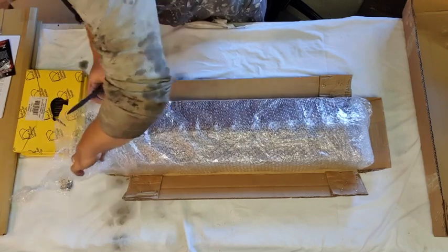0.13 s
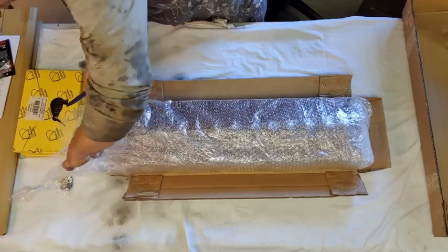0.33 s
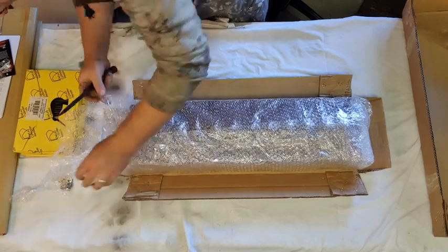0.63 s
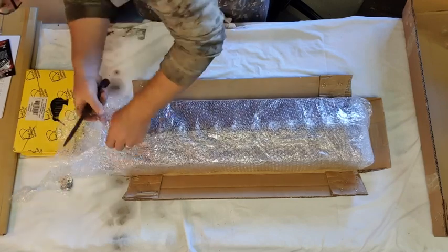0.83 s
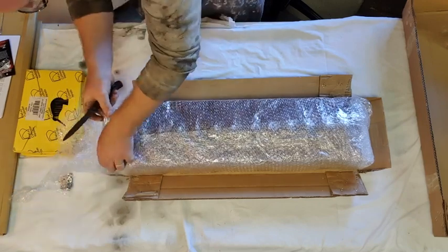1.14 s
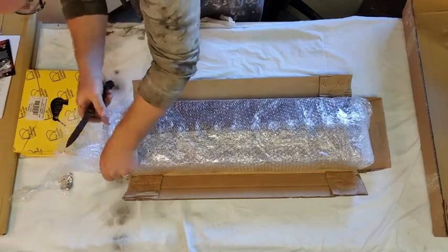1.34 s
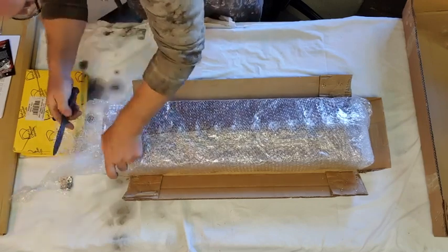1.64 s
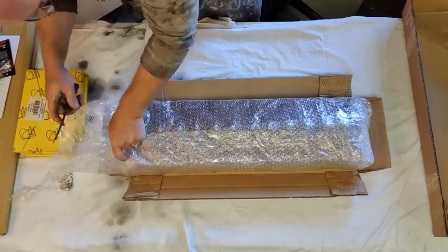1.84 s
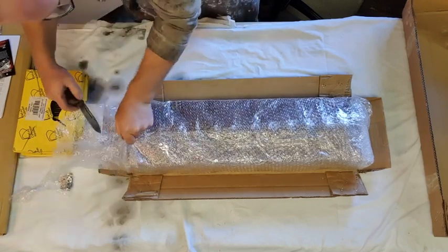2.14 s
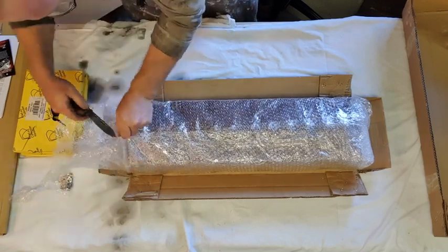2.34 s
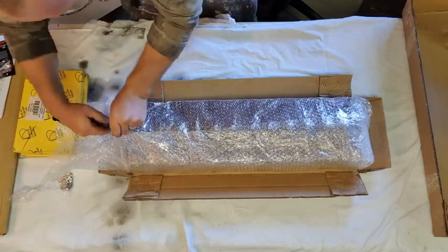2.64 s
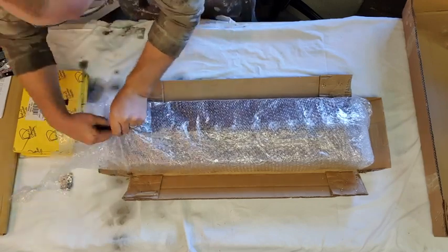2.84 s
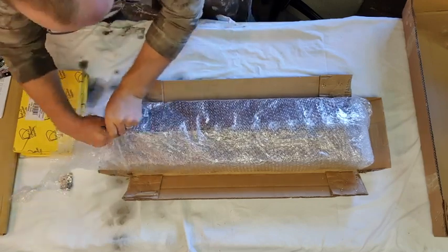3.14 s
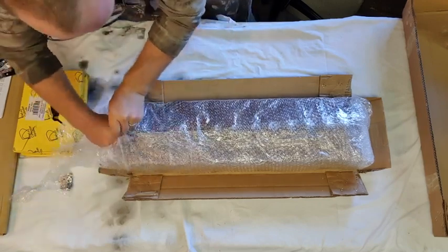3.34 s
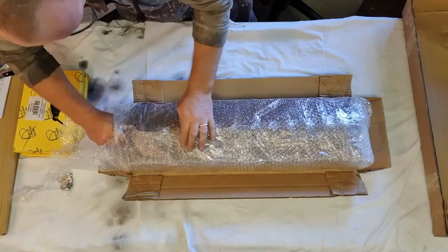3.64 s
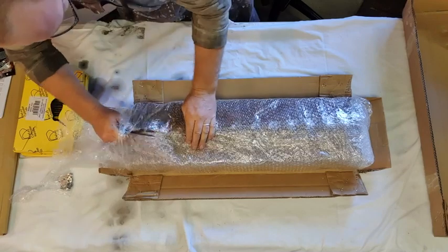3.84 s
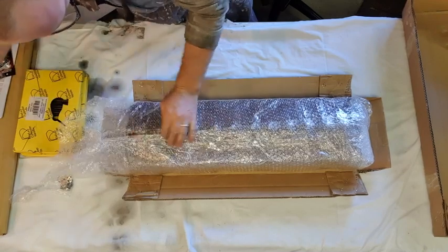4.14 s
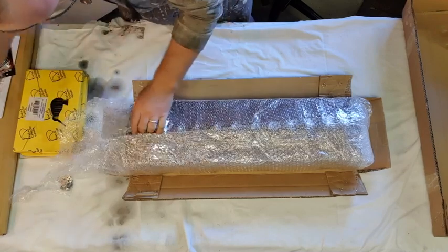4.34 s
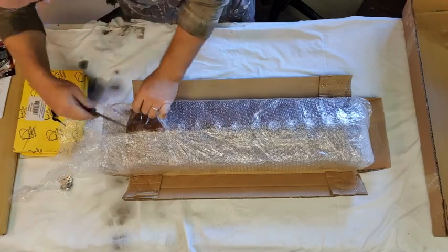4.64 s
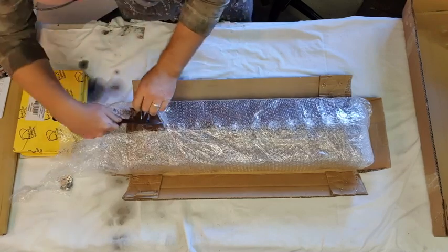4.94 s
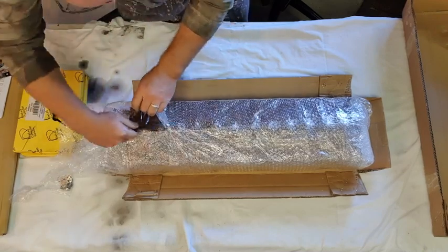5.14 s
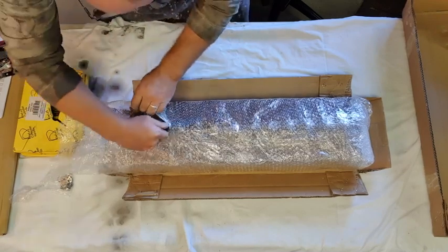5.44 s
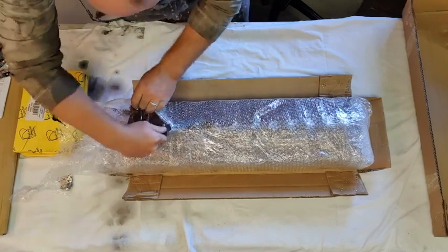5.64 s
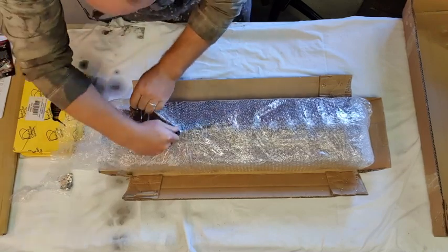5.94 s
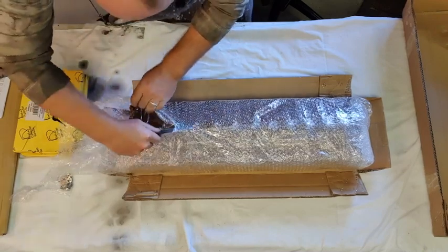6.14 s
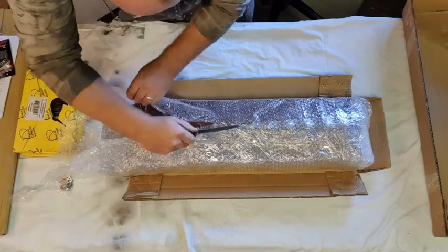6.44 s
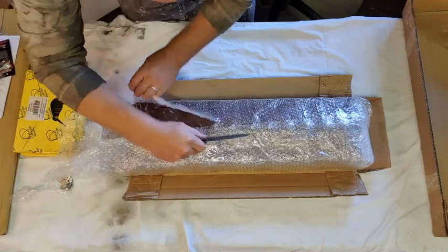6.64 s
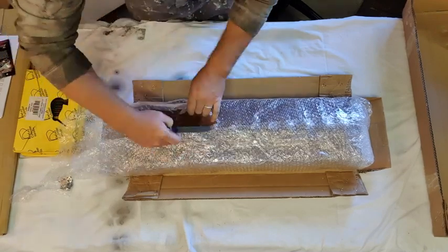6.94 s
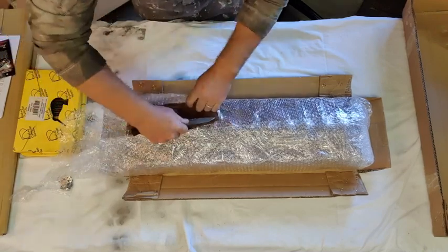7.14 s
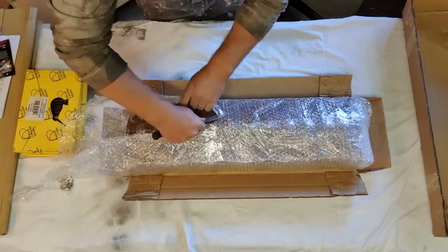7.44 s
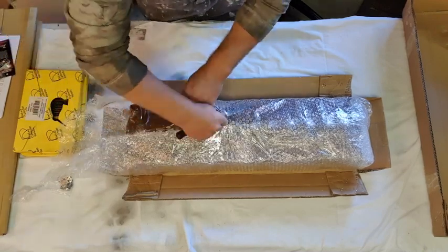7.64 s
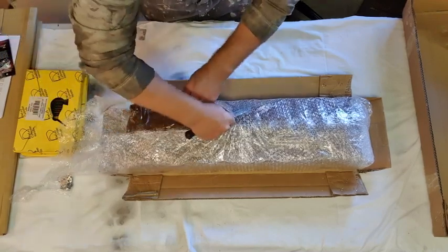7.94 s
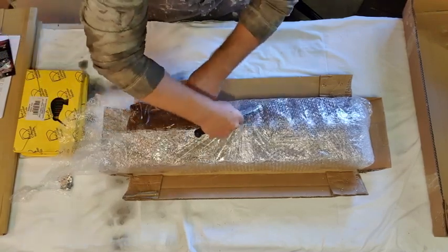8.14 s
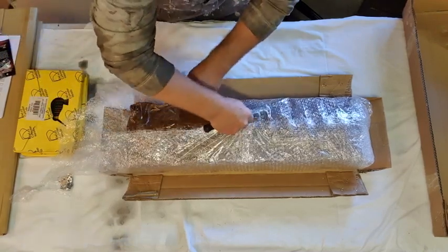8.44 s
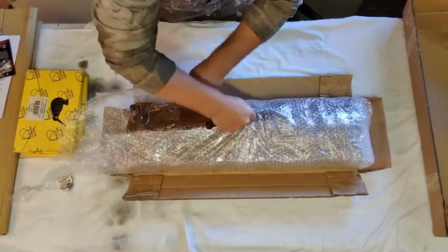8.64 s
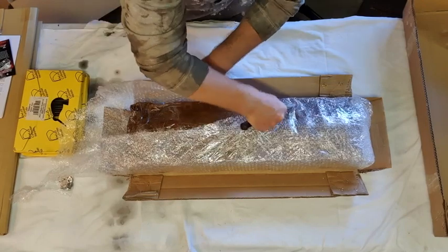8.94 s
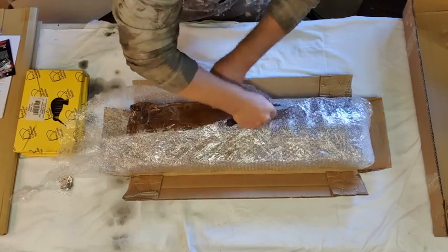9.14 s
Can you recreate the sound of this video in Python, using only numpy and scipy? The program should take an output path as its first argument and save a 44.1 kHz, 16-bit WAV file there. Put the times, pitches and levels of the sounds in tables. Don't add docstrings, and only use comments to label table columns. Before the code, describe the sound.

Hands grip and rustle bubble wrap quietly for about three seconds, with small crease ticks and soft bench bumps. Two very loud clusters of ripping cracks follow, with a hollow parcel boom. Then quieter handling, faint slipping squeaks, and a knife popping rows of bubbles in short bursts. Close stereo microphones in a bare, live workshop where each snap rings briefly over low rumble.

```python
import sys
import numpy as np
from scipy import signal
from scipy.fft import rfft, irfft, next_fast_len
from scipy.io import wavfile
from scipy.ndimage import uniform_filter1d, map_coordinates

SR = 44100
rng = np.random.default_rng(int(sys.argv[2]) if len(sys.argv) > 2 else 0)


def wav_record(signal):
    frames = np.transpose(np.atleast_2d(signal))
    bounded = np.clip(frames, -1, 1)
    quanta = np.round(bounded * 32767).astype(np.int16)
    wavfile.write(sys.argv[1], SR, quanta)


def makeup_ratio(level_db):
    decades = np.asarray(level_db, float) / 20
    return 10 ** decades


N = 410130


def releases():
    # t/s, peak level/dB, crack f/Hz, low push/dB, bright edge/dB
    tears = [(3.3636, -21.5, 2360, -22, -2), (3.3991, -19.5, 1400, -3.5, -7),
             (3.6141, -5.5, 1220, -8.5, -3.5), (3.6165, -26, 1140, -12, -18), (3.6219, -8, 4700, -3, -15),
             (3.626, 1.5, 1910, -17, -14), (3.6361, -25, 1740, -20, -7.5), (3.6745, -1.5, 2640, -9, -16.5),
             (3.8545, -26.5, 1770, -3, -28), (3.8584, -5, 2600, -16.5, -8), (3.8672, -5.5, 2320, -4, -15),
             (3.9072, -2.5, 1960, -13, -6.5), (3.9152, -2, 3050, -14.5, -11)]
    # t/s, peak level/dB, crack f/Hz, low push/dB, bright edge/dB
    cuts = [(5.4504, -20.5, 2360, -25, 1.5), (6.2518, -23, 1100, -3, -22),
            (6.2562, -12.5, 1940, -3.5, -10.5), (6.2637, -14, 1050, -6, -15),
            (6.2722, -12.5, 2270, -4.5, -17), (6.2878, -6, 2440, -9, -8), (6.2925, -19.5, 2200, 3.5, -16),
            (6.2985, -23, 910, -9, -13), (6.3257, -1.5, 2760, -15.5, -22), (6.3258, -2.5, 4000, -23, -30),
            (6.3403, -7.5, 2170, -17.5, -18), (6.3458, -12, 2360, -11, -14),
            (6.3472, -7.5, 2450, -10.5, -9.5), (7.452, -34, 690, -1, -24), (7.572, -6, 2330, -10, -14.5),
            (8.1045, -42, 3300, -12, -12), (8.109, -13, 2450, -4, -18), (8.1273, -21, 2620, -9, -11),
            (8.1315, -26, 2200, 0.5, -16), (8.1385, -31, 2500, -12, -14), (8.1628, -28, 2480, -22, -16),
            (8.1708, -12.5, 2730, -8.5, -23), (8.7563, -19, 2400, -6, -6.5),
            (8.7742, -25.5, 2600, -2, -2.5), (8.7891, -10, 1440, -1, -10), (8.7977, -9, 2330, 0, -8),
            (8.8024, -1, 2920, -14.5, -10), (8.8116, -11.5, 2300, -0.5, -4), (8.8142, -22.5, 3200, -6, -14),
            (8.8246, -12.5, 1880, -15, -9), (8.8285, -21, 2400, -20, -5), (8.8579, -14.5, 1700, -2, -13.5),
            (8.8601, -17.5, 1410, -5, -14)]
    # t/s, peak level/dB, crack f/Hz, bright edge/dB
    ticks = [(0.963, -49, 1800, -16), (1.2437, -31, 2920, -4), (4.566, -34.5, 1980, -11),
             (2.8426, -34.5, 2340, -14), (2.8474, -42, 4350, -8), (2.8661, -31.5, 1040, -46),
             (2.869, -26.5, 1210, -29), (2.9734, -42, 3380, -5), (2.9979, -30, 1320, -18),
             (3.0453, -44, 1020, 8), (3.58, -33, 1760, -19), (5.265, -48, 4200, 7), (5.4573, -40, 2260, 16),
             (5.592, -26, 2320, -11), (5.6328, -37, 2120, -20), (5.6461, -32, 1970, -12),
             (5.8098, -28.5, 3120, -5), (5.96, -41, 4200, -1), (6.249, -29, 1080, -22),
             (6.5628, -32.5, 3000, 3.5), (6.8799, -36, 3360, -10), (6.886, -38, 3110, -11),
             (6.8976, -31.5, 3050, -5), (7.264, -43, 1200, -24), (7.4, -31.5, 2600, -24),
             (7.5066, -31, 2440, -26), (7.8013, -47, 2270, -14), (8.074, -39.5, 2530, -14),
             (8.624, -35, 2360, -10), (8.637, -33, 3060, -6), (8.752, -29, 1650, -15),
             (8.9996, -38, 1450, -15), (9.0582, -28, 2740, -1.5)]
    tick_push_db = -16.5
    flips = [(s, db, hz, tick_push_db, edge_db) for s, db, hz, edge_db in ticks]
    return sorted(tears + cuts + flips)


def crack(hz, t):
    ring = -np.sin(2 * np.pi * hz * t) * makeup_ratio(-60 * t * hz / 8.6) * (1 - np.exp(-t * hz / 0.25))
    rip = uniform_filter1d(uniform_filter1d(rng.standard_normal(len(t)), size=6), size=4)
    rip = rip - uniform_filter1d(rip, size=48)
    return ring + 0.86 * rip * makeup_ratio(-60 * t / 0.0033)


def sheet_push(hz, t):
    t60_s, attack_s = .011, 0.00075
    return np.sin(2 * np.pi * hz * t) * makeup_ratio(-60 * t / t60_s) * (1 - np.exp(-t / attack_s))


def snaps(count):
    # t/s, f/Hz
    sheet = [(0, 610), (3.6, 686), (3.68, 603), (3.87, 620), (3.91, 420), (5.45, 519), (6.25, 670),
             (6.35, 622), (7.57, 583), (8.11, 420), (8.17, 610), (8.79, 610), (8.805, 424), (8.86, 534),
             (9.3, 520)]
    pitch_scatter = .1
    out, t = np.zeros((2, count, N + SR)), np.arange(1024) / SR
    sheet_hz, = curves(sheet)
    for k, (s, db, hz, push_db, _) in enumerate(releases()):
        start = round(s * SR)
        push_hz = sheet_hz[start] * np.exp(pitch_scatter * rng.standard_normal())
        push = makeup_ratio(push_db + 3.0) * sheet_push(push_hz, t)
        out[:, k % count, start:start + len(t)] += makeup_ratio(db + 3.0) * np.array([crack(hz, t), push])
    return out[..., :N]


def edges():
    size, t = np.zeros(N + SR), np.arange(1024) / SR
    decay = makeup_ratio(-60 * t / 0.0048) + 0.25 * makeup_ratio(-60 * t / 0.04)
    for s, db, *_, edge_db in releases():
        size[round(s * SR):][:len(t)] += makeup_ratio(db + edge_db) * decay
    colour = [(2000, -21.5), (3500, -1.5), (6000, 1.5), (9000, -8.0), (16000, -8.0)]  # f/Hz, level/dB
    return size[:N] * coloured(rng.standard_normal((2, N)), colour)


def handling():
    # t/s, hold/s, level/dB, weight on the parcel/dB
    grips = [(0.0, 0.24, -46, -5.5), (0.352, 0.063, -47, -6), (0.558, 0.073, -54, -7.5),
             (0.87, 0.014, -53.5, -1.5), (1, 0.22, -53, -4), (1.245, 0.097, -47.5, -4),
             (1.512, 0.15, -58, -5.5), (1.752, 0.24, -50.5, -6.5), (2.086, 0.05, -51, -8.5),
             (2.21, 0.098, -58.5, -6.5), (2.335, 0.078, -56, -6.5), (2.486, 0.0089, -51, -2),
             (2.656, 0.028, -49, -3), (2.813, 0.15, -53, -1), (3.046, 0.08, -49.5, -5),
             (3.134, 0.17, -54.5, -1.5), (3.408, 0.0079, -38, -1.5), (3.537, 0.39, -52.5, 1.5),
             (3.884, 0.031, -31, -6), (3.918, 0.057, -40.5, 4), (4.222, 0.052, -56, -2.5),
             (4.32, 0.36, -53.5, -4.5)]
    # t/s, hold/s, level/dB, weight on the parcel/dB
    tugs = [(4.965, 0.24, -63.5, 2), (5.282, 0.11, -55, -4.5), (5.476, 0.017, -42, -11),
            (5.587, 0.15, -59.5, -1.5), (5.786, 0.089, -50, -8.5), (6.02, 0.075, -53, -9),
            (6.265, .07, -43, -2), (6.335, 0.012, -41, 8), (6.586, 0.022, -48.5, -8),
            (6.911, 0.039, -46, 1), (7.073, 0.047, -46, -4.5), (7.251, 0.026, -54, -0.5),
            (7.426, 0.11, -56.5, 2), (7.596, 0.067, -43, 0), (7.658, 0.028, -52, -10),
            (7.774, 0.026, -56.5, -16), (7.887, 0.0089, -56.5, -11), (8.1, 0.022, -48, -13),
            (8.12, 0.074, -47, 5), (8.26, 0.079, -54, -24), (8.414, 0.0087, -43.5, -2),
            (8.604, 0.014, -48.5, -4.5), (8.798, 0.051, -35, 4), (9.002, 0.072, -46.5, -3.5),
            (9.226, 0.031, -51.5, -2.5)]
    rise_db_per_s = 240.5
    fall_db_per_s = (125, 134, 139)
    rest_db = (-65.5, -70.5, -85.5)
    grip_hiss_db, tug_hiss_db, hiss_per_weight = -13, -11, -0.2
    s, hold, db, weight = np.transpose(grips + tugs)[:, :, None]
    hiss_db = np.repeat([grip_hiss_db, tug_hiss_db], [len(grips), len(tugs)])[:, None]
    hiss_db = hiss_db + hiss_per_weight * weight
    t = np.arange(0, N / SR + .002, .002)
    gains = []
    for level, fall, rest in zip((db, db + weight, db + hiss_db), fall_db_per_s, rest_db):
        moves = makeup_ratio(movement(t, s, hold, level, rise_db_per_s, fall))
        power = np.sum(moves ** 2, axis=0) + makeup_ratio(rest) ** 2
        gains.append(np.interp(np.arange(N) / SR, t, uniform_filter1d(np.sqrt(power), size=11)))
    return gains


def movement(t, s, hold, db, rise, fall):
    return db - rise * np.maximum(s - t, 0) - fall * np.maximum(t - s - hold, 0)


def creases(rate, spread_db, clump_db):
    struck = rng.random(N) < rate / SR * makeup_ratio(clump_db * wobble(25))
    size_db = spread_db * np.minimum(rng.exponential(size=N), 4)
    return struck * rng.choice([-1, 1], N) * makeup_ratio(size_db)


def patchy(depth_db):
    z = signal.stft(diffuse(rng.standard_normal((2, N))), nperseg=512)[2]
    field = rng.standard_normal(z.shape[1:])
    field = uniform_filter1d(uniform_filter1d(field, size=5, axis=0), size=9, axis=1)
    return signal.istft(z * makeup_ratio(depth_db * unit(field)), nperseg=512)[1][:, :N]


def crease_wash():
    return patchy(depth_db=2.0) * makeup_ratio(0.42 * wobble(16) + 1.4 * wobble(40))


def rustle(wash):
    # f/Hz, level/dB per Hz
    film_colour = [(530, -61.5), (900, -38), (944, -22.5), (1220, -9.5), (2500, 1.5), (3300, -2), (3970, 1),
                   (6870, -9.5), (9000, -43.5), (11700, -26), (19800, -120)]
    # f/Hz, level/dB per Hz
    body_colour = [(120, -8), (200, -8), (257, -3.5), (461, -5.5), (554, -0.5), (731, -5), (1140, -7),
                   (1600, -15.5), (2080, -18.5), (3520, -120)]
    # f/Hz, level/dB per Hz
    hiss_colour = [(4120, -40), (7000, -12.5), (8110, -11), (15100, -12.5), (16100, -21), (16500, -45)]
    gains = handling()
    ticks = heard(creases(rate=600, spread_db=3.0, clump_db=4.5))
    film = 0
    tick_shares = (.35, .3, .25)
    for gain, colour, share in zip(gains, (film_colour, body_colour, hiss_colour), tick_shares):
        layer = share * coloured(ticks, colour) + (1 - share) * coloured(wash, colour)
        film = film + gain * unit(layer)
    pricks = heard(creases(rate=9.1, spread_db=2.0, clump_db=15.5))
    return film + makeup_ratio(-7.5) * gains[2] * coloured(pricks, hiss_colour)


def knife_stroke(wash):
    # f/Hz, level/dB
    blade_ring = [(900, -62), (1700, -18.5), (2200, 3), (2700, -7), (4500, -56)]
    level_db = movement(np.arange(N) / SR, s=5.15, hold=.45, db=-62.5, rise=86, fall=140)
    return makeup_ratio(level_db) * coloured(wash, blade_ring)


def squeaks():
    # t/s, length/s, f/Hz, level/dB, roughness (0 clear tone, about 1 all noise)
    slips = [(1.242, .12, 950, -49.5, 0.4), (2.883, 0.036, 1215, -52, .5), (4.391, 0.19, 600, -52, 0.96),
             (4.65, 0.21, 540, -59.5, 0.87), (4.93, 0.13, 505, -63.5, 0.4), (5.2, 0.38, 625, -64, 1),
             (5.745, 0.16, 1113, -64, 1.1), (6.021, 0.11, 1095, -61, 1.1), (6.185, 0.14, 1143, -53, 1.06),
             (6.952, 0.27, 587, -60.5, 1.2), (7.24, 0.19, 781.5, -56.5, 0.06), (7.43, 0.11, 767, -59, 0.8),
             (7.399, 0.19, 1190, -59, 0.97)]
    waver, breath_per_s, octave_db = .025, 85, -15
    out, t = np.zeros(N), np.arange(N) / SR
    drift = wobble(20)
    grain = wobble(breath_per_s) + 1j * wobble(breath_per_s)
    for s, length, hz, db, rough in slips:
        on = slice(round(s * SR), round((s + length) * SR))
        turn = 2 * np.pi * np.cumsum(hz * (1 + waver * rough * drift[on])) / SR
        shape = np.abs(np.sin(np.pi * (t[on] - s) / length)) ** 0.35
        tone = np.exp(1j * turn) + makeup_ratio(octave_db) * np.exp(2j * turn)
        slip = (1 - rough + rough * grain[on]) * tone
        out[on] += makeup_ratio(db) * shape * slip.real
    return out


def knocks(table, cycles, attack):
    out, t = np.zeros(N + SR), np.arange(SR // 4) / SR
    for s, db, hz in table:
        ring = makeup_ratio(db - 60 * t * hz / cycles) * np.sin(2 * np.pi * hz * t)
        out[round(s * SR):][:len(t)] += ring * (1 - np.exp(-t / attack))
    return out[:N]


def parcel_booms():
    # t/s, peak level/dB, f/Hz
    pulls = [(0.009, -33.5, 181), (3.394, -29.5, 393), (3.615, -18, 325), (3.679, -19.5, 335),
             (3.865, -10.5, 379), (3.913, -11, 370), (3.965, -36, 426), (6.29, -28.5, 310),
             (6.329, -16.5, 349), (8.108, -35, 318), (8.791, -13, 281), (8.823, -17.5, 284)]
    return knocks(pulls, cycles=17.0, attack=0.0011)


def parcel_taps():
    # t/s, peak level/dB, f/Hz
    taps = [(2.866, -28, 635), (2.867, -33, 1220), (2.996, -31.5, 635), (2.997, -47, 1260),
            (4.564, -42.5, 788), (6.895, -33.5, 582), (6.925, -35, 393), (7.074, -38, 643),
            (7.25, -42, 352), (7.074, -45, 345), (7.445, -41.5, 420), (7.508, -40, 755), (8.415, -46, 440)]
    return knocks(taps, cycles=26.5, attack=0.0023)


def bench_bumps():
    # t/s, peak level/dB, f/Hz
    bumps = [(0.326, -32.5, 149), (0.894, -56, 96), (3.104, -27, 125), (3.236, -37, 142), (3.614, -44, 100),
             (3.694, -26, 114), (3.901, -46, 113), (3.906, -22.5, 134), (6.25, -34, 180), (7.571, -60, 147),
             (8.1, -29.5, 119), (8.437, -42, 110), (8.792, -18, 230), (9.159, -35.5, 155)]
    return knocks(bumps, cycles=12.0, attack=0.0014)


def near_walls(x):
    walls = [(.0025, -10), (.0045, -14), (.0078, -16), (.012, -17)]
    out = np.zeros((2, N))
    for delay, db in walls:
        for ear in out:
            late = round(delay * SR) + rng.integers(-8, 8)
            ear[late:] += makeup_ratio(db) * x[:-late]
    return out


def ringing(count):
    # f/Hz, level/dB per Hz
    tail_colour = [(260, -34), (420, -12.5), (600, 1), (761, -5), (828, -6.5), (1410, -3.5), (2450, -9),
                   (4070, -4.5), (12800, -30.5), (16000, -54)]
    out = np.zeros((count, N))
    for k, (s, db, *_) in enumerate(releases()):
        out[k % count, round((s + .003) * SR)] = makeup_ratio(db)
    return np.sqrt(np.mean(out ** 2)) * coloured(out, tail_colour)


def shop(x):
    # f/Hz, t60/s
    t60 = [(150, 0.4), (500, 0.4), (2000, 0.41), (6000, 0.43), (14000, 0.42)]
    hz, t, z = signal.stft(diffuse(rng.standard_normal((2, SR))), SR, nperseg=256)
    decay = makeup_ratio(-60 * t / along(t60, hz)[:, None])
    tail = signal.istft(z * decay, SR, nperseg=256)[1]
    tail = tail * (1 - np.exp(-np.arange(tail.shape[1]) / SR / 0.0018))
    return signal.fftconvolve(x[None], tail / np.linalg.norm(tail[0]), axes=1)[:, :N]


def rumble():
    # t/s, level/dB
    drone = [(0.0, -40), (.25, -50.5), (.9, -52), (1.27, -50), (1.76, -53.5), (2.15, -48.5), (3.4, -48),
             (3.8, -41.5), (4.12, -51.5), (4.7, -54), (5.8, -57.5), (6.15, -60), (6.8, -59.5), (7.07, -56),
             (7.43, -60), (7.75, -58), (8.9, -56.5), (9.3, -51)]
    # f/Hz, level/dB per Hz
    drone_colour = [(13, -61), (22, -32), (46, 2), (69, 0.5), (92, -3), (129, -15.5), (166, -8.5),
                    (198, -16), (300, -21.5), (390, -18.5), (660, -120)]
    level_db = curves(drone)[0] + 1.3 * wobble(4.6)
    return makeup_ratio(level_db) * coloured(diffuse(rng.standard_normal((2, N))), drone_colour)


def heard(x):
    # t/s, left lead/ms
    place = [(0, 0.16), (4, 0.14), (6.5, 0.063), (9.3, -0.028)]
    lead = curves(place)[0] * SR / 2000
    return np.array([map_coordinates(x, [np.arange(N) + side * lead], order=3) for side in (1, -1)])


def diffuse(pair):
    spacing_m, speed_m_per_s = 0.14, 343
    n = pair.shape[1]
    turn = np.arccos(np.sinc(2 * np.fft.rfftfreq(n, 1 / SR) * spacing_m / speed_m_per_s)) / 2
    side_gain = np.hypot(np.sin(turn), .09)
    mid, side = irfft(rfft(pair) * [np.cos(turn), side_gain], n)
    return np.array([mid + side, mid - side])


def coloured(x, spectrum):
    m = next_fast_len(x.shape[-1] + 8192)
    gain = makeup_ratio(along(spectrum, np.fft.rfftfreq(m, 1 / SR)))
    return unit(irfft(rfft(x, m) * gain, m)[..., :x.shape[-1]])


def wobble(rate):
    knots = rng.standard_normal(int(N * rate / SR) + 4)
    return map_coordinates(knots, [np.arange(N) * rate / SR])


def curves(rows):
    s, *cols = np.transpose(rows)
    return [np.interp(np.arange(N) / SR, s, c) for c in cols]


def along(points, hz):
    f, v = np.transpose(points)
    return np.interp(np.log(hz + 1), np.log(f + 1), v)


def unit(x):
    return x / np.sqrt(np.mean(x ** 2) + 1e-20)


def scene():
    cracks, pushes = snaps(count=3)
    film = (cracks + pushes).sum(0)
    small = bench_bumps() + parcel_taps() + squeaks() + parcel_booms()
    away = makeup_ratio(4.0) * ringing(count=3) + makeup_ratio(-3.0) * cracks + makeup_ratio(-2.5) * pushes + makeup_ratio(-8.5) * small
    wet = sum(shop(track) for track in away)
    direct = heard(film + small) + near_walls(film) + makeup_ratio(-4.5) * edges()
    wash = crease_wash()
    return direct + wet + rustle(wash) + knife_stroke(wash) + rumble()


def roll_off(x):
    return signal.sosfilt(signal.butter(12, 15950, fs=SR, output="sos"), x)


def record(dry):
    bass_hz, top_hz, ceiling = 30, 15050, .95
    hz = np.fft.rfftfreq(N, 1 / SR)
    bass_cut = (hz / bass_hz) ** 2 / (1 + (hz / bass_hz) ** 2)
    band = bass_cut / (1 + (hz / top_hz) ** 40)
    tilt = makeup_ratio([[1.2], [-1.2]] * np.clip(hz / 12000 - .3, -.2, 1))
    x = irfft(rfft(dry) * band * tilt, N)
    mix = x / (1 + np.abs(x / ceiling) ** 4) ** (1 / 4)
    return roll_off(mix)


dry = scene()
out = record(dry)
wav_record(out)
```